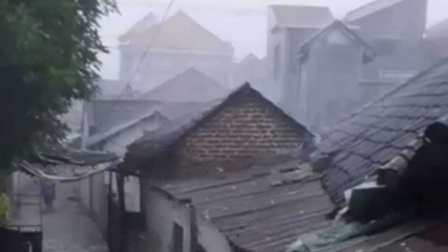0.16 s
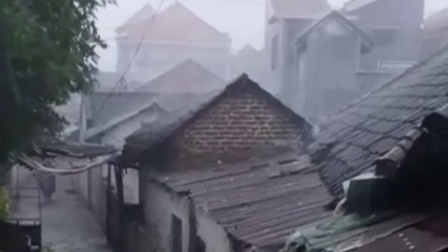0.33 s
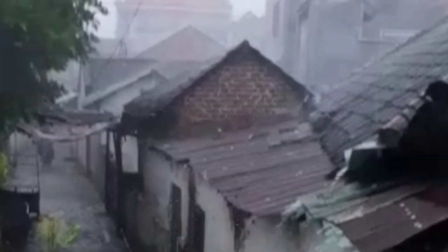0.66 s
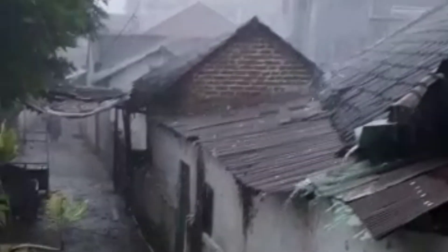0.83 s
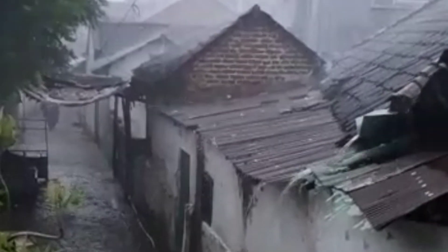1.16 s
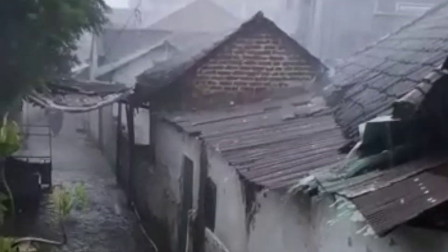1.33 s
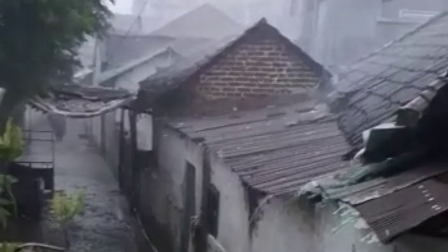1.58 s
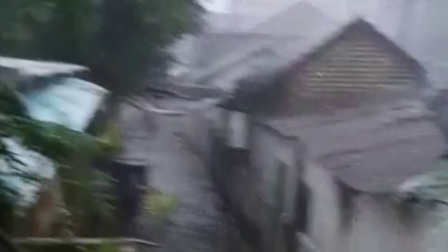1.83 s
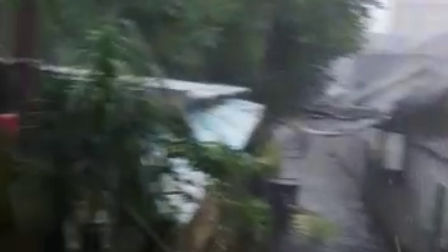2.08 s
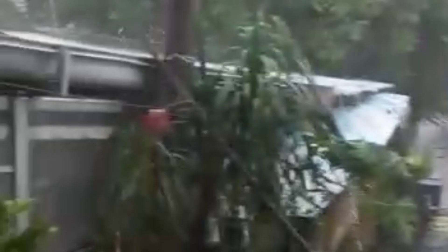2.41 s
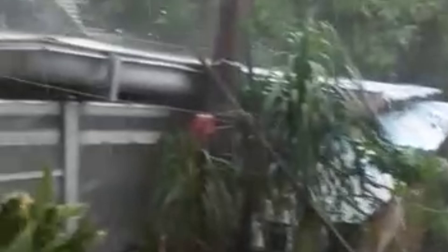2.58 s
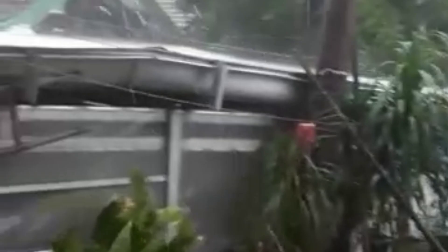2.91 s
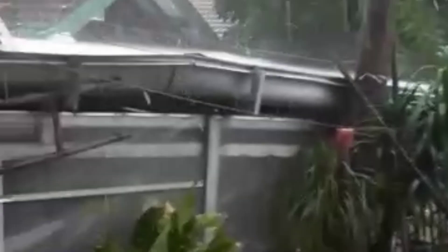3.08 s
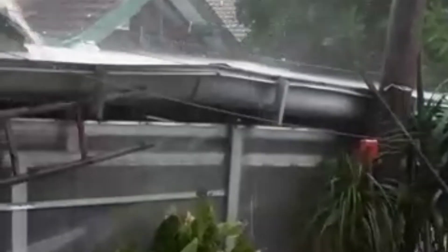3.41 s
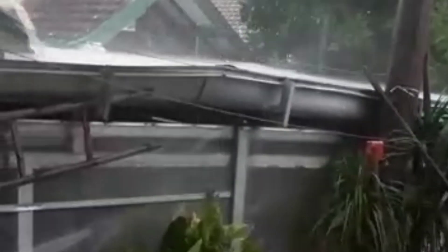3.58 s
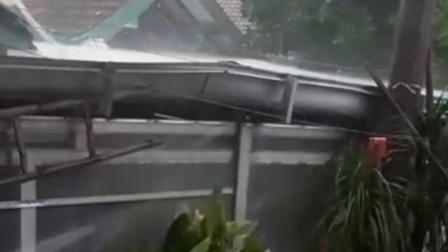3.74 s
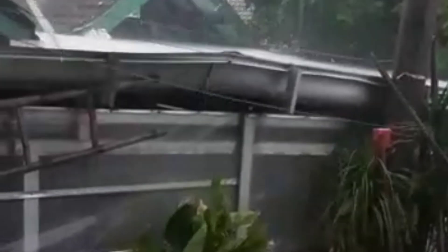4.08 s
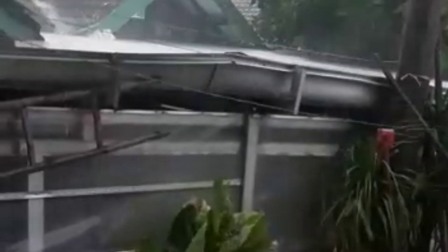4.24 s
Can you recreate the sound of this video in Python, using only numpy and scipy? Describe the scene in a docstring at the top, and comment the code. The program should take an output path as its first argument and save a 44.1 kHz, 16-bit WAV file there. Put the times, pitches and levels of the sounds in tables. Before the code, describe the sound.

Heard from under an eave in a village, a dense, bright hiss of rain and hail covers everything. Big stones bang on roof sheets in irregular clusters, each with a brief metallic shiver, over constant rattling and ticking. The hits thin out around two seconds, then crowd together from three to three and a half seconds. Handheld stereo microphone, close and slightly overloaded on the loudest crashes.

```python
"""Hailstorm on village roofs

Heard from under an eave: rain on tin and tile roofs is a bright wash of noise that follows the downpour.
Big hailstones crash on roof sheets, which shiver briefly; smaller ones rattle in between, as louder noise.
Ice pellets tick and clink close by as short ringing clicks, and some stones ring out with a pitch or shatter.
Midway the listener turns to a metal awning, and a narrow range of the roof noise grows louder."""
import sys
import numpy as np
from scipy import signal
from scipy.fft import rfft, irfft, next_fast_len
from scipy.io import wavfile

SR = 44100
rng = np.random.default_rng(int(sys.argv[2]) if len(sys.argv) > 2 else 0)


def int16_out(signal):
    """Quantize to a 16-bit WAV file."""
    q = np.round(np.clip(np.atleast_2d(signal).T, -1, 1) * 32767)
    wavfile.write(sys.argv[1], SR, q.astype(np.int16))


N = 195482
TIME = np.arange(N) / SR

# colour of the struck roofs: pitch_hz, relative level_db (power per Hz)
ROOF_COLOUR = [(25, -37), (60, -23.2), (120, -17), (165, -11.5), (290, -13), (350, -10.5), (600, -8.5),
               (760, 0), (1750, -0.32), (2150, 1.8), (4150, -1.15), (5200, -6), (8100, -22), (10500, -16.5),
               (15000, -22.5)]
BOOM_HZ, CLANG_HZ, CRACK_HZ = 1010, 2020, 3430   # low, middle and high part of a crash
PORT_DELAY_S = 0.00039   # longest delay between the two microphone ports


def from_db(db):
    """Turn decibels into a gain."""
    return 10 ** (np.asarray(db) / 20)


def rms_one(x):
    """Scale a sound to an rms of 1."""
    return x / np.sqrt(np.mean(x ** 2) + 1e-20)


def at_hz(points, hz):
    """Read a table at any pitch, with straight lines between points on a log pitch axis."""
    points = np.array(points)
    return np.interp(np.log(np.maximum(hz, 1)), np.log(points[:, 0]), points[:, 1])


def roofs(downpour, rain_db, small_db, small_per_s, small_t60, small_rise_s, size_db,
          boom_db, clang_db, crack_db, mix_db, patchy_db, bass_db, top_db):
    """Rain keeps the sheets hissing, small hail rattles them at random, big stones shake their modes."""
    # biggest stones: start_s, then clang, boom and crack level_db before the trims and contrast below
    strikes = [(0.217, -4, -19, -15), (0.33, -7, -16.5, -22), (0.555, -6, -16, -14.5),
               (0.668, -2, -13.5, -30), (0.719, -5, -13, -16), (0.74, 0.5, -16, -11.5),
               (1.019, -3, -16.5, -14.5), (1.071, -7, -17.5, -13.5), (1.203, -7, -19, -15.5),
               (1.313, -8, -19, -18), (1.402, -6, -14.5, -14), (1.565, -5.5, -24, -10),
               (1.755, -8, -30, -16), (1.792, -5, -14.5, -16.5), (2.102, -14, -15, -16.5),
               (2.133, -2.5, -15, -21), (2.378, -4, -17, -16.5), (2.959, -2.5, -13.5, -14),
               (3.06, 0, -12.5, -11.5), (3.118, -1, -30, -20), (3.204, -8, -19.5, -17),
               (3.252, -5, -36, -16), (3.341, -2, -17, -12.5), (3.367, -3, -12.5, -11.5),
               (3.397, -3, -20, -11), (3.499, 2, -14.5, -16), (3.561, -14, -15, -14),
               (3.649, -6.5, -33, -15), (3.722, -2, -18, -15.5), (3.985, -6, -22, -17),
               (4.078, -7, -22.5, -14)]
    strike_contrast = 1.214   # the sheet's level in dB grows this much faster than that of the blow
    sheet_t60_s, sheet_t60_slope = 0.36, 0.21   # t60 at the clang pitch, shorter as this power of pitch
    sheet_rise_s = 0.0046
    turn_start_s, turn_end_s = 1.7, 2.8
    awning_hz, awning_width_oct, awning_db = 1095, 0.11, 3.0   # resonance of the awning

    starts, clangs, booms, cracks = np.transpose(strikes)
    big_at = np.clip(starts * SR, 0, N - 1).astype(int)
    colours = np.transpose([booms + boom_db, clangs + clang_db, cracks + crack_db])
    chance = rng.random((int(small_per_s * N / SR), 2))
    small_at = (chance[:, 0] * N).astype(int)
    small_sizes = from_db(size_db * chance[:, 1])
    facing = np.interp(TIME, [turn_start_s, turn_end_s], [0, 1])

    out = 0
    for hz, band in roof_bands():
        off_centre = np.log2(hz / awning_hz) / awning_width_oct
        awning = from_db(awning_db * np.exp(-off_centre ** 2))
        band = band * (1 + facing * (awning - 1))

        # how much each part of the crash counts in this band
        boom = at_hz([(BOOM_HZ, 1), (CLANG_HZ, 0)], hz)
        crack = at_hz([(CLANG_HZ, 0), (CRACK_HZ, 1)], hz)
        shares = [boom, 1 - boom - crack, crack]

        # each blow's strength varies from band to band; squaring turns it into power
        own_db = mix_db * rng.standard_normal(len(starts))
        big = from_db(strike_contrast * colours @ shares + own_db) ** 2
        patches_db = 2 * patchy_db * rng.uniform(-3.65, 1, N)[small_at]
        small = (small_sizes * from_db(patches_db)) ** 2

        sheet_t60 = sheet_t60_s * (CLANG_HZ / max(hz, BOOM_HZ)) ** sheet_t60_slope
        crash = shiver(np.bincount(big_at, big, N), sheet_t60, sheet_rise_s)
        rattle = shiver(np.bincount(small_at, small, N), small_t60, small_rise_s)
        hail = crash + (downpour * from_db(small_db)) ** 2 * rattle / rattle.mean()

        # blows stand out most in the middle range; the ends are mostly rain
        ends_db = at_hz([(250, bass_db), (700, 0), (5500, 0), (10000, top_db)], hz)
        rain = (downpour * from_db(rain_db)) ** 2
        out = out + band * np.sqrt(hail * from_db(ends_db) ** 2 + rain)
    return out


def shiver(blows, t60, rise_s):
    """Power of a sheet: each blow spreads over it within milliseconds, then dies away."""
    keep = 10 ** (-6 / (t60 * SR))   # power falls by 60 dB in t60 seconds
    lag = np.exp(-1 / (rise_s * SR))
    return signal.lfilter([1 - lag], [1, -keep - lag, keep * lag], blows + 1e-18)


def roof_bands(count=28):
    """The countless modes of the roofs as stereo noise of rms 1, split into (Hz, band) pairs."""
    # part of the sound that both microphone ports share: pitch_hz, share (0-1)
    shared = [(30, 0.1), (80, 0.64), (200, 0.86), (400, 0.96), (1200, 0.83), (3000, 0), (7000, 0)]
    # left minus right: pitch_hz, level_db
    balance = [(60, 3), (200, 1), (400, .2), (750, .7), (1200, -0.5), (4500, 0), (7000, 2.5), (14000, 1)]
    roof_lag_s, roof_share = 0.00016, 0.56   # a roof on the left reaches the right port later

    size = next_fast_len(N)
    hz = np.arange(size // 2 + 1) * SR / size
    left, other = rfft(rng.standard_normal((2, size)))

    # blend sound from all round with sound from the roof on the left
    around = np.sinc(2 * hz * PORT_DELAY_S)
    aside = np.exp(-2j * np.pi * hz * roof_lag_s)
    alike = np.clip(at_hz(shared, hz), 0, 1) * (around + roof_share * (aside - around))
    right = alike * left + np.sqrt(np.maximum(1 - abs(alike) ** 2, 0)) * other

    tilt_db = at_hz(balance, hz) * [[0.5], [-0.5]]
    field = np.array([left, right]) * from_db(at_hz(ROOF_COLOUR, hz) + tilt_db)
    field = (field / irfft(field, size).std()).astype(np.complex64)

    # overlapping triangular bands that add up to the whole noise
    centres = np.r_[100, 250, 450, np.geomspace(700, 6000, count - 5), 8000, 12000]
    for k, centre in enumerate(centres):
        weight = np.interp(hz, centres, np.eye(count)[k]).astype(np.float32)
        yield centre, irfft(field * weight, size)[:, :N]


def pings(width_hz, spread, rise_s, count=9):
    """A stone on a tile, gutter or sheet edge rings close modes, a little differently at each port."""
    # stones that ring out: start_s, pitch_hz, level_db
    ringing_stones = [(.312, 799, -11.5), (.318, 1370, -8.5), (.728, 990, -15), (.751, 3210, -3.5),
                      (1.043, 2340, -6), (1.112, 1004, -13), (1.5645, 3480, 4), (1.573, 4620, -1),
                      (1.589, 846, -10), (3.088, 2260, -4), (3.369, 2094, 1), (3.423, 2090, -3.5),
                      (3.445, 1100, -8.5), (3.5, 3650, -1), (4.179, 3080, -4), (4.266, 893, -14)]
    t60_s, t60_slope = 0.062, 1   # ring time at the clang pitch, shorter as this power of pitch

    out, t = np.zeros((2, N)), TIME[:SR // 4]
    place = np.linspace(-1, 1, count)
    strengths = np.exp(-2 * abs(place))[:, None]   # modes far from the centre ring less
    for start_s, hz, level_db in ringing_stones:
        t60 = t60_s * (CLANG_HZ / hz) ** t60_slope
        jitter = rng.uniform(-0.84, 1, count) / count
        modes = hz + (width_hz + spread * hz) * (place + jitter)

        # the modes start roughly in step, so the attack is sharp, then beat against each other
        phases = rng.normal(0, 1.1, count) + rng.normal(0, 0.6, (2, count))
        waves = np.sin(2 * np.pi * modes[:, None] * t + phases[..., None])
        tone = (strengths * waves).sum(axis=1)
        envelope = from_db(-60 * t / t60) * (1 - np.exp(-t / rise_s))

        # as strong as one sine with the same envelope
        sound = rms_one(tone * envelope) * np.sqrt(np.mean(envelope ** 2) / 2)
        start = int(start_s * SR)
        out[:, start:start + len(t)] += from_db(level_db) * sound[:, :N - start]
    return out


def snaps(t60, low_hz, high_hz):
    """Ice shatters on hard surfaces close by in a bright noise burst that dies within milliseconds."""
    # stones that shatter: start_s, peak level_db
    shattering_stones = [(1.0445, -8), (1.1171, -1), (1.5648, -9), (3.3424, -3), (3.99, -6.5),
                         (4.179, -5.5)]
    out, t = np.zeros((2, N)), TIME[:SR // 100]
    brightness = signal.butter(1, [low_hz, high_hz], "band", fs=SR, output="sos")
    for start_s, peak_db in shattering_stones:
        noise = rng.standard_normal((2, len(t))) * from_db(-60 * t / t60)
        burst = signal.sosfilt(brightness, noise)
        start = int(start_s * SR)
        out[:, start:start + len(t)] += from_db(peak_db) * burst[:, :N - start] / abs(burst).max()
    return out


def pellets(per_s, size_db, t60, snap_db, count):
    """Ice pellets land close by: a snap and a short ring, each spot with its own pitch and direction."""
    sizes = from_db(size_db * np.minimum(rng.exponential(1, N), 2.5)) * rng.choice([-1, 1], N)
    clicks = sizes * (rng.random(N) < per_s / SR)
    spot, out = rng.integers(0, count, N), np.zeros((2, N))
    pitches = np.geomspace(720, 5500, count) * rng.uniform(0.94, 1.02, count)
    for k, hz in enumerate(pitches):
        here = clicks * (spot == k)
        # high-pitched spots start louder and die sooner
        tone = ring(here, hz, t60 * np.sqrt(CLANG_HZ / hz)) * (hz / CLANG_HZ) ** 0.48
        tick = tone + from_db(snap_db) * here
        # a spot on the right (above 0) is louder and earlier in the right channel
        side = rng.uniform(-0.98, 1)
        out[0] += tick * from_db(-2 * side)
        out[1] += np.roll(tick, -round(side * PORT_DELAY_S * SR)) * from_db(2 * side)
    return rms_one(roof_colour(out))


def ring(clicks, hz, t60):
    """A unit click sets a sine of height 1 ringing, which falls by 60 dB in t60 seconds."""
    r = from_db(-60 / (t60 * SR))
    w = 2 * np.pi * hz / SR
    return signal.lfilter([0, np.sin(w)], [1, -2 * r * np.cos(w), r * r], clicks + 1e-18)


def roof_colour(sound):
    """Give a sound the broad colour that the roofs have."""
    size = next_fast_len(N)
    colour = from_db(at_hz(ROOF_COLOUR, np.arange(size // 2 + 1) * SR / size))
    return irfft(rfft(sound, size) * colour, size)[:, :N]


def scene():
    """Roofs all round; nearer, pellets tick on walls and clink on tiles, and stones ring or shatter."""
    # strength of the downpour: start_s, level_db
    downpour_levels = [(0.0, -17.5), (0.27, -19), (0.39, -16.5), (0.89, -15.5), (1.28, -15.5),
                       (1.66, -18.5), (2.75, -19), (2.95, -16.5), (3.18, -15.5), (3.49, -13.5), (3.77, -19),
                       (4.43, -19.5)]
    downpour = from_db(np.interp(TIME, *np.transpose(downpour_levels)))
    sheets = roofs(downpour, rain_db=-1.5, small_db=-3.0, small_per_s=100, small_t60=0.16,
                   small_rise_s=0.0026, size_db=11.0, boom_db=7.0, clang_db=-4.5, crack_db=5.5,
                   mix_db=1.5, patchy_db=9.0, bass_db=-4.5, top_db=-2.5)
    ticks = from_db(-7.0) * pellets(per_s=800, size_db=3.0, t60=0.0051, snap_db=3.5, count=24)
    clinks = from_db(-6.5) * pellets(per_s=260, size_db=4.5, t60=0.1, snap_db=-15, count=64)
    ringing = pings(width_hz=13.4, spread=0.078, rise_s=0.0007)
    shattering = snaps(t60=0.007, low_hz=2500, high_hz=5550)
    return sheets + downpour * (ticks + clinks) + ringing + shattering


def record(dry):
    """The loudest crashes overload the recorder, which flattens their peaks; the top is cut."""
    clipped = np.clip(dry, -0.97, 0.97)
    top_cut = signal.ellip(10, 0.1, 70, 15250, fs=SR, output="sos")   # low-pass at 15250 Hz
    return signal.sosfilt(top_cut, clipped)


dry = scene()
out = record(dry)
int16_out(out)
```